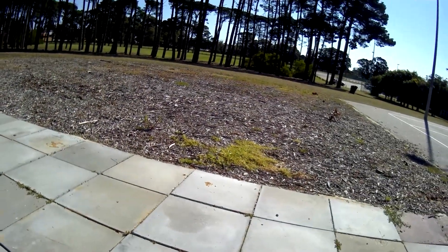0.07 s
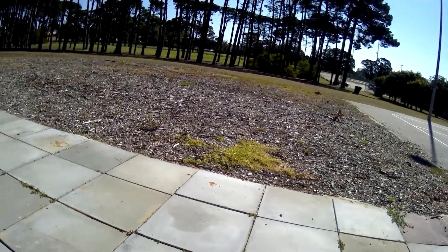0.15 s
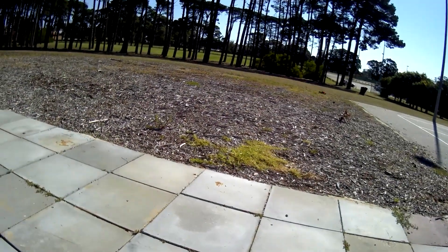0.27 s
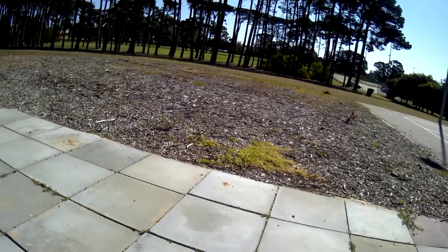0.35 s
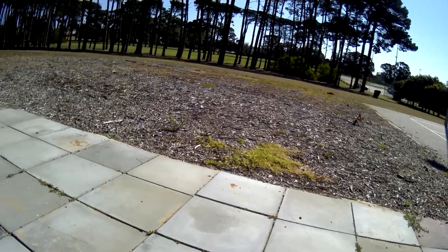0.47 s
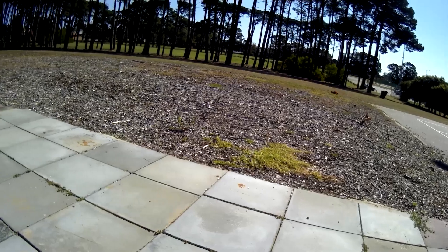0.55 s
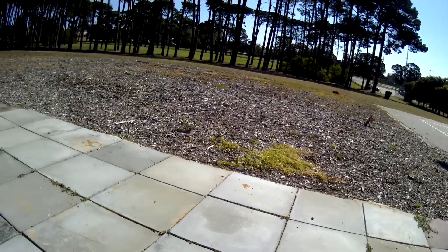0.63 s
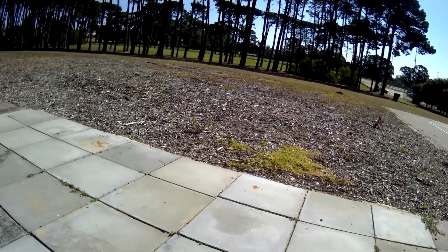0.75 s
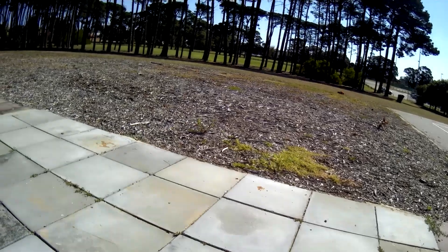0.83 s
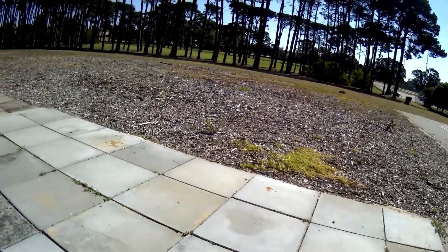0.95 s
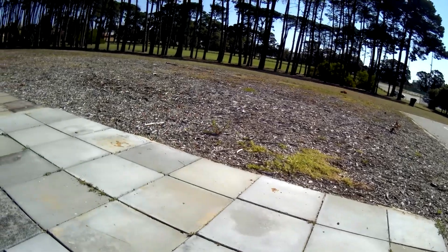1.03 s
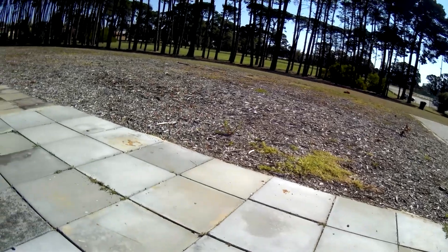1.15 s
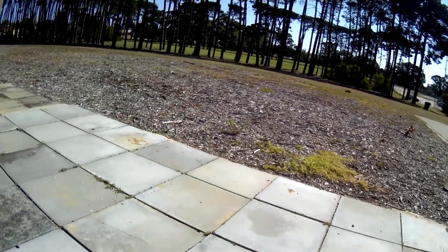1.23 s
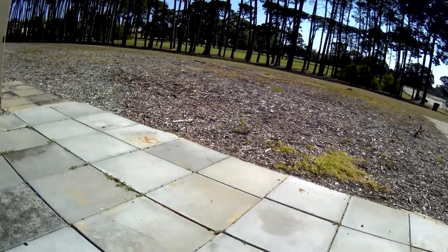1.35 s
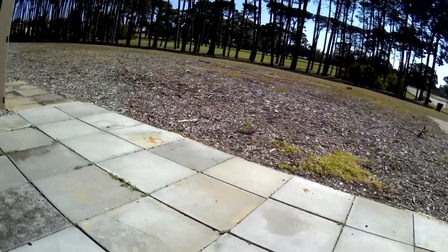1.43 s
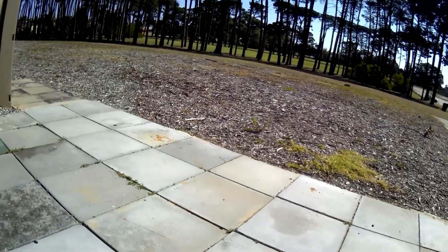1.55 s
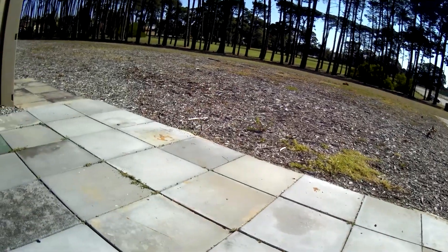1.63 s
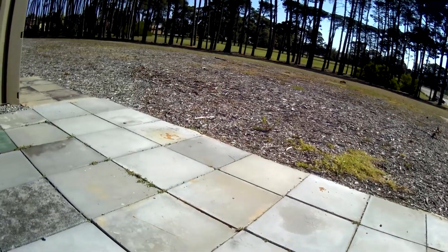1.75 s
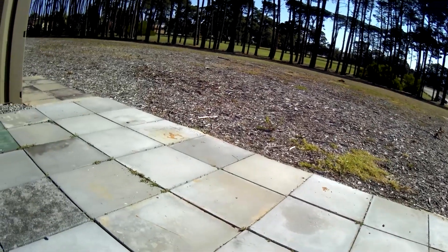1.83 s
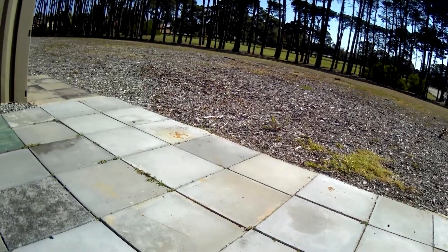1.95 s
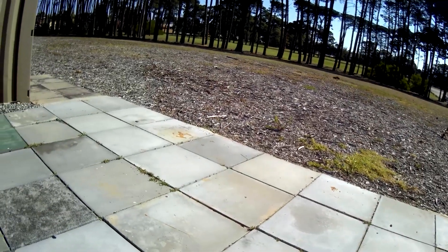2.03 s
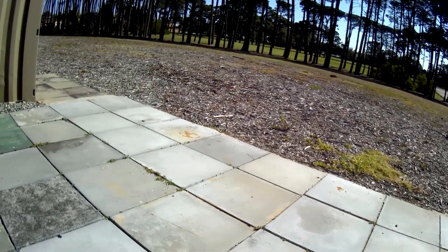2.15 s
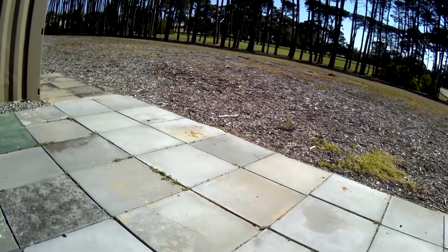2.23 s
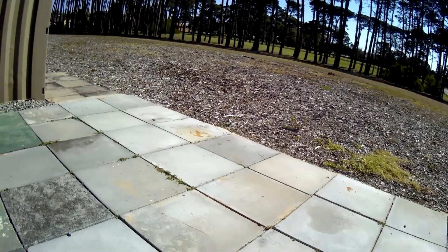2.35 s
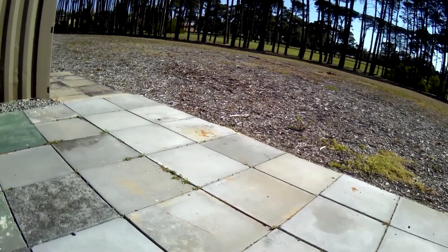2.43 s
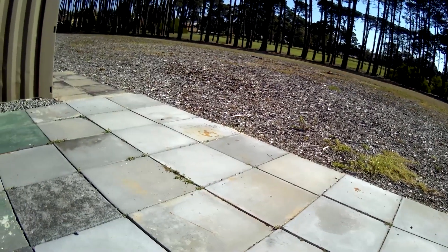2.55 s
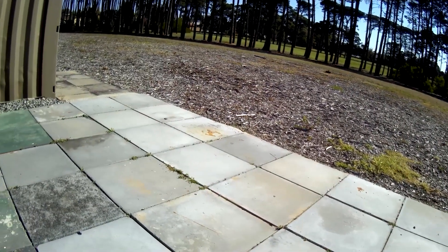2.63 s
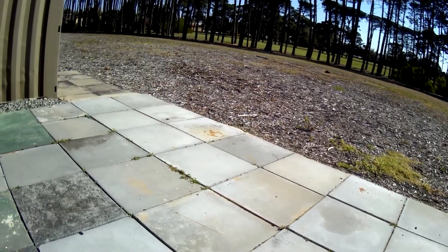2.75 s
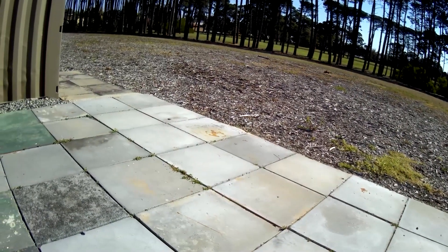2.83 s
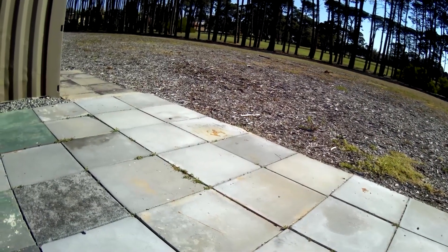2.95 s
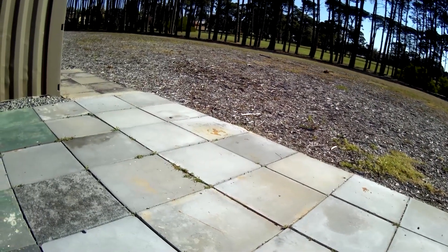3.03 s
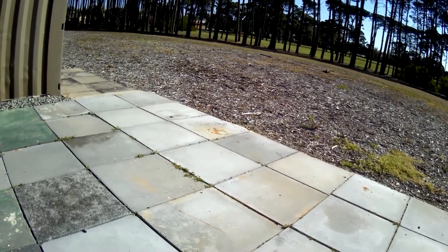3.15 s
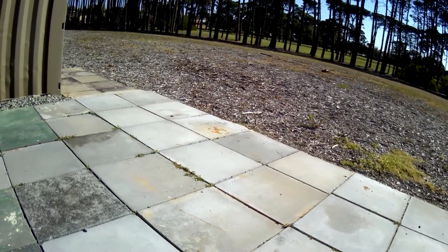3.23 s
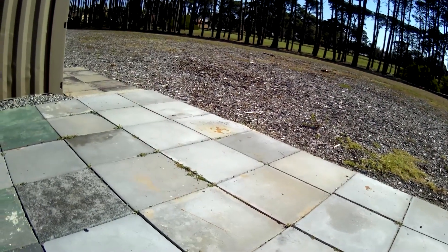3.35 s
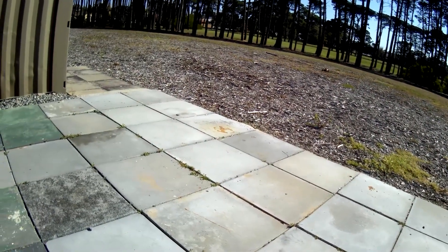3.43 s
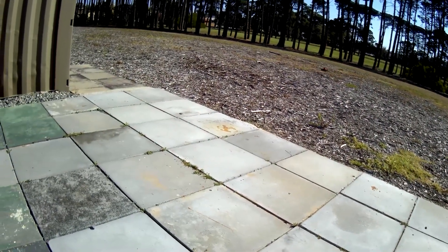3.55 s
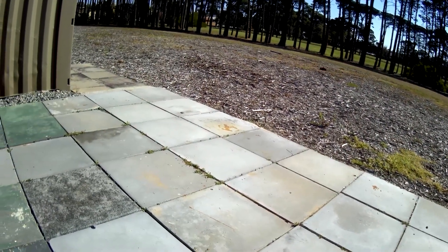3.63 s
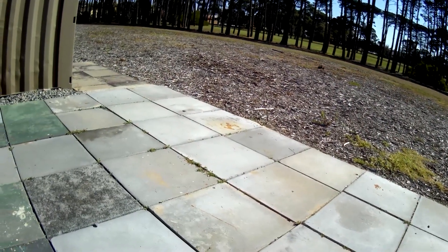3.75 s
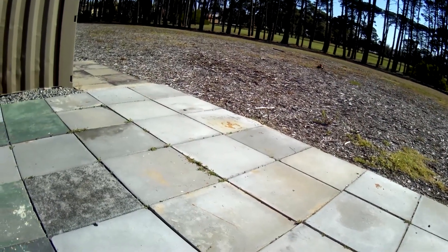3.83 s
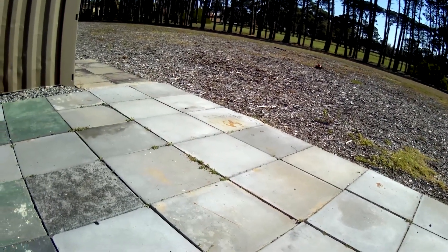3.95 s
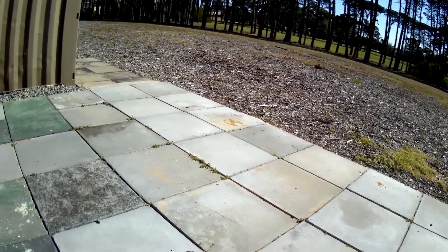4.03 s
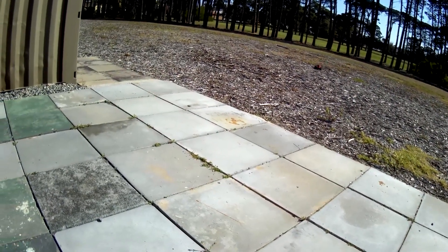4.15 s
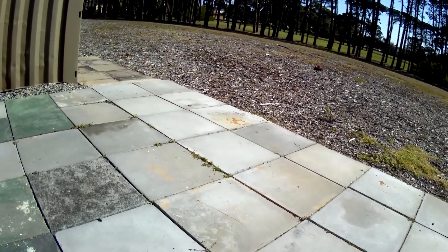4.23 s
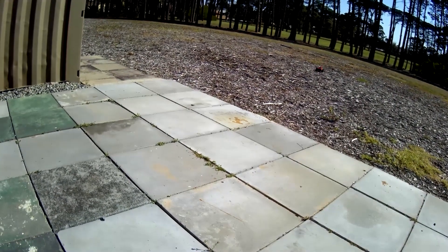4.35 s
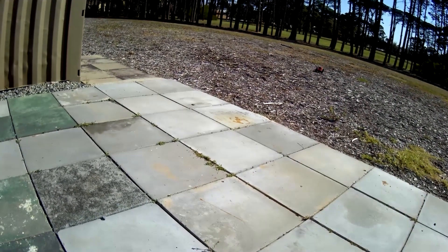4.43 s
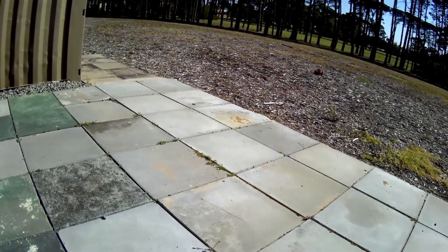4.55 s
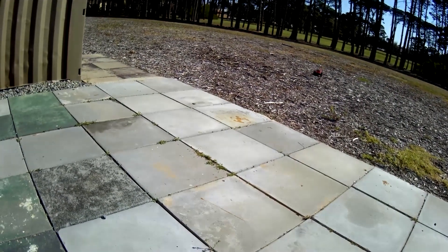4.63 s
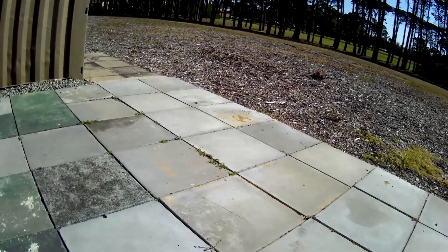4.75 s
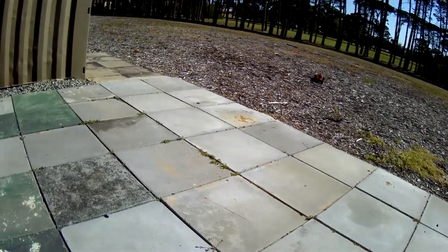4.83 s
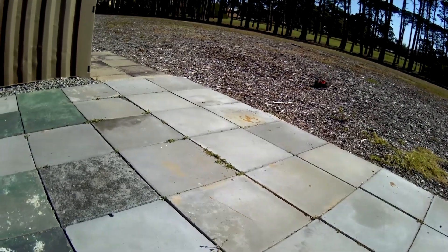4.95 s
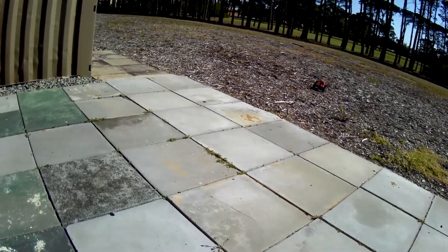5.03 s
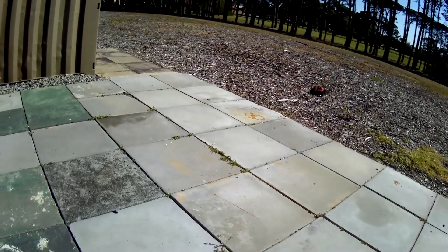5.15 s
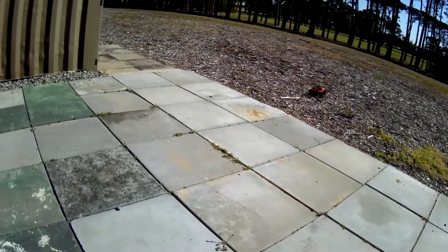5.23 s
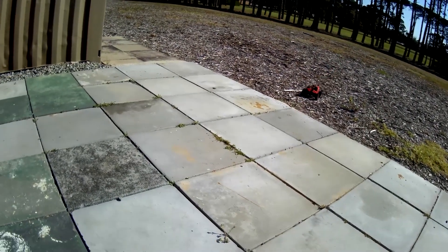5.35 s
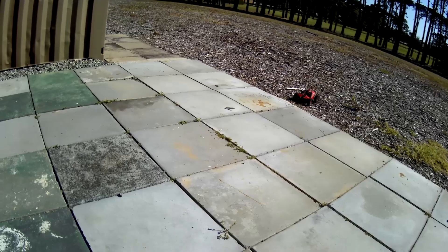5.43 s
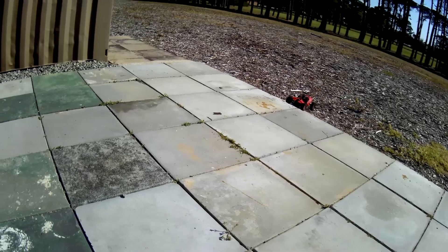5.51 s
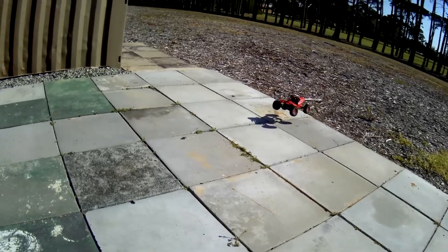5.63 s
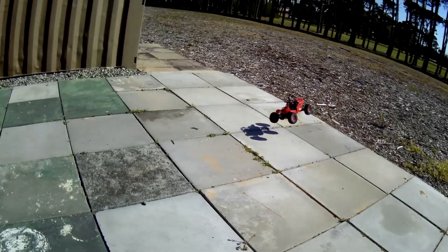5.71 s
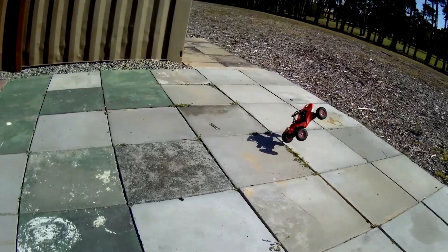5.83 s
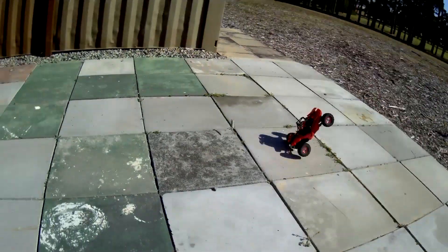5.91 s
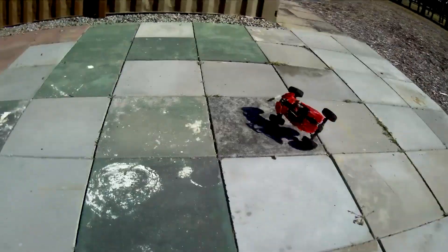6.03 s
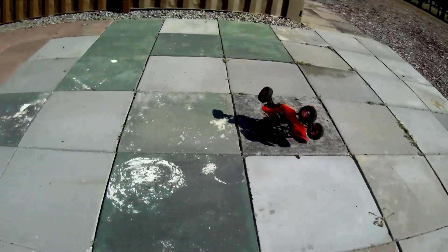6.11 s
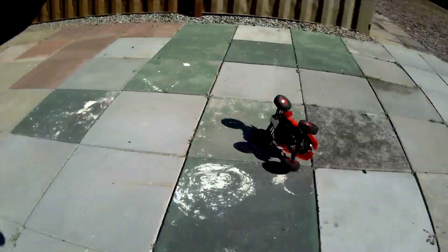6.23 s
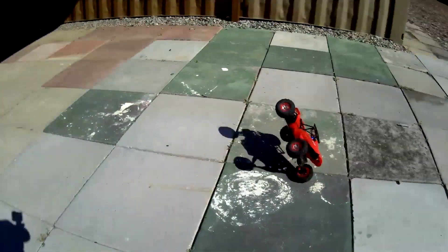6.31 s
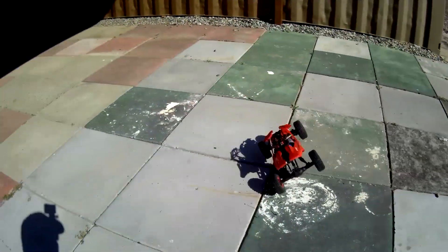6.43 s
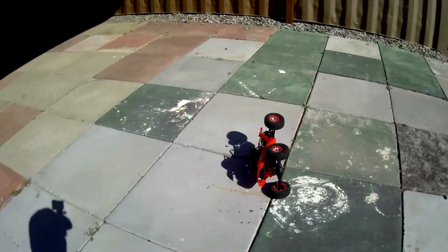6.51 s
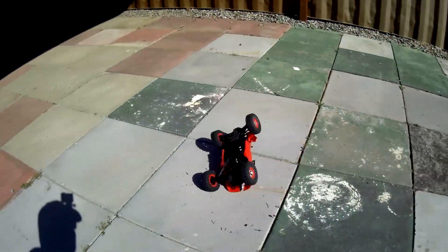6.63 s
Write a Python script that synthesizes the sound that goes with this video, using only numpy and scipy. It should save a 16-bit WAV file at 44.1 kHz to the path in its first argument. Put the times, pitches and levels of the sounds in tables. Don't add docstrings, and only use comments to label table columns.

```python
import sys
import numpy as np
from scipy import signal
from scipy.fft import irfft, next_fast_len
from scipy.io import wavfile
from scipy.ndimage import uniform_filter1d

SR = 44100
rng = np.random.default_rng(int(sys.argv[2]) if len(sys.argv) > 2 else 0)


def pcm_store(signal):
    levels = np.round(np.clip(np.atleast_2d(signal), -1, 1) * 32767)
    wavfile.write(sys.argv[1], SR, levels.astype(np.int16).T)


def attenuation_scalar(level_db):
    decades = np.asarray(level_db, float) / 20
    return 10 ** decades


N = 294271
T = np.arange(N) / SR


def evened(x):
    return x / np.sqrt(np.mean(x ** 2) + 1e-20)


def columns(rows):
    times_s, *values = np.transpose(rows)
    return [np.interp(T, times_s, v) for v in values]


def resonate(x, hz, width_hz):
    turn = np.exp(2j * np.pi * np.cumsum(hz * np.ones(len(x))) / SR)
    pole = np.exp(-np.pi * width_hz / SR)
    smooth = signal.lfilter([1 - pole], [1, -pole], x / turn + 1e-18)
    return 2 * (turn * smooth).real


def wobble(hz):
    once = resonate(rng.standard_normal(N), 0, hz)
    return evened(resonate(once, 0, hz))


def hiss(points):
    point_hz, point_db = np.transpose(points)
    hz = np.fft.rfftfreq(next_fast_len(N), 1 / SR)
    z = rng.standard_normal(len(hz)) + 1j * rng.standard_normal(len(hz))
    shape_db = np.interp(np.log(hz + 1), np.log(point_hz), point_db, left=-60, right=-90)
    return evened(irfft(z * attenuation_scalar(shape_db))[:N])


def grit(per_s, spread_db, bump_db):
    size = attenuation_scalar(spread_db * np.minimum(rng.exponential(1, N), 4)) * rng.choice([-1, 1], N)
    happens = rng.random(N) < per_s / SR
    return size * happens * attenuation_scalar(bump_db * wobble(52.0))


def truck():
    # start_s, rattle_db, thump_db (relative to the rattle)
    body = [
        [(0, -64, -8), (2, -61, -7), (3, -58.5, -2), (3.4, -53.5, -3.5), (3.9, -51.5, -5.5), (4.3, -49.5, -0.5)],
        [(4.4, -47, -1), (4.47, -45.5, -8), (4.8, -43, -1.5), (4.87, -40, -14), (4.9, -41.5, -3),
         (5.3, -38.5, -1.5), (5.61, -29.5, -7.5), (5.65, -36.5, -6.5), (5.72, -32.5, -22.5), (5.8, -32, -26),
         (5.95, -24.5, -10), (5.99, -27.5, -17), (6.01, -25, -17), (6.03, -33.5, -3), (6.04, -30, -16),
         (6.08, -23.5, 1.5), (6.09, -10, -31), (6.12, -33, -14), (6.15, -22.5, -18), (6.16, -27, -10),
         (6.18, -24.5, -25), (6.21, -23, -11), (6.27, -42, -6), (6.29, -34, 8), (6.31, -34, -13.5),
         (6.42, -46.5, -10.5), (6.48, -39, -2), (6.61, -41.5, -9.5), (6.64, -29.5, -11), (6.66, -39, -6),
         (6.67, -32.5, -2)],
    ]
    # start_s, level_db, centre_hz
    whine_course = [
        [(0.0, -87, 3360), (0.18, -77, 3165), (0.39, -73.5, 3460), (0.52, -78, 3210), (0.56, -74, 3290),
         (0.6, -88, 3460), (0.61, -61, 3470), (0.63, -77, 3490), (0.88, -72, 3050), (1.0, -78.5, 3210),
         (1.21, -64.5, 3100), (1.56, -81, 3270), (1.61, -69.5, 3050), (1.63, -85, 3070), (1.76, -63, 3060),
         (1.88, -85, 3120), (1.92, -62, 3120), (2.0, -61, 3150), (2.04, -77, 3060), (2.14, -62, 3020),
         (2.4, -75, 3040), (2.45, -61, 3095), (2.7, -73, 3300), (2.83, -64.5, 3140), (2.91, -75, 3340),
         (3.11, -65, 2945), (3.13, -81, 3100), (3.19, -63, 3450), (3.23, -81, 3260), (3.3, -61, 3140)],
        [(3.3, -57.5, 3080), (3.49, -55, 3380), (3.94, -54.5, 3460), (4.85, -45, 3580), (4.93, -52.5, 3460),
         (5.02, -39.5, 3230), (5.09, -51, 3560), (5.1, -42.5, 3585), (5.53, -37.5, 3396), (5.55, -32.5, 3300),
         (5.57, -40.5, 3370), (5.63, -39, 3696), (5.65, -25.5, 3510), (5.66, -38, 3650), (5.81, -49, 2994),
         (5.86, -54, 3260), (5.91, -41, 3430), (5.97, -33.5, 3210), (6.0, -49, 3390), (6.02, -44.5, 3530),
         (6.11, -36.5, 3210), (6.19, -57, 3210), (6.2, -46.5, 3184), (6.37, -73.5, 3080), (6.45, -74, 3220),
         (6.47, -64, 3400), (6.57, -60, 3250), (6.59, -86, 3190), (6.62, -59.5, 3215), (6.67, -50, 3160)],
    ]
    # centre_hz, width_hz, level_db
    modes = [(710, 400, -8.5), (970, 320, -2), (1150, 360, -5), (1327, 220, -4), (1538, 360, 5),
             (1991, 440, -8), (2570, 1000, -21.5)]
    rattle_db, thump_db = columns(body[0] + body[1])
    whine_db, whine_hz = columns(whine_course[0] + whine_course[1])

    shake = grit(2500., 2.2, 1.1)
    shell = 0
    for hz, width_hz, db in modes:
        mode = resonate(resonate(shake, hz, width_hz), hz, width_hz * 2.2)
        shell = shell + attenuation_scalar(db) / np.sqrt(width_hz) * mode

    teeth = grit(2200., 1.3, 3.2)
    unsteady_hz = whine_hz * (1 + 0.048 * wobble(25.))
    mesh = resonate(resonate(teeth, unsteady_hz, 220.0), whine_hz, 410.0)
    housing_band = signal.butter(4, (2950., 3720.), "band", fs=SR, output="sos")
    gearbox = signal.sosfilt(housing_band, teeth)
    whine = evened(1.4 * evened(mesh) + evened(gearbox))

    thump = resonate(resonate(grit(300., 2.7, 2.6), 320.0, 260.0), 360., 610.0)
    rolling = 0.91 * evened(shell) + attenuation_scalar(thump_db - 0.5) * evened(thump)
    return attenuation_scalar(rattle_db) * rolling + attenuation_scalar(whine_db + 1.5) * whine


def knocks():
    # start_s, peak_db, ring_hz, thud_db, thud_hz, tick_db
    blows = [(0.543, -32.5, 840, -20, 221, -30), (4.688, -30, 1225, -1, 295, 1.5),
             (4.95, -27.5, 1236, -15.5, 312, -8), (5.099, -27, 1410, 3.5, 223, -16),
             (5.198, -36, 1550, -5.5, 430, -13), (5.445, -25, 1760, 5.5, 240, -18),
             (5.522, -17.5, 1590, -22, 277, -8), (5.549, -16, 1600, -16, 358, -17),
             (5.6, -18, 854, -7.5, 437, -1), (5.641, -23, 1414, -11, 360, 9.5),
             (5.898, -23, 1540, -5, 390, -1.5), (5.938, -15.5, 1530, -24, 390, 1),
             (6.009, -17.5, 2116, -7, 221, -24.5), (6.04, -13.5, 1840, -23, 256, -15),
             (6.056, -14.5, 1885, -20, 221, -25), (6.063, -10.5, 1527, -21, 550, -42),
             (6.071, -11.5, 890, -1.5, 296, -14), (6.086, 0.5, 1585, -45, 320, -27.5),
             (6.101, -14, 1623, -24, 245, -27), (6.132, -9, 1425, -33, 221, -24),
             (6.145, -11, 1475, -29, 266, -37), (6.183, -15, 1706, -35, 345, -35),
             (6.21, -8, 866, -19.5, 390, -19.5), (6.232, -13, 1041, -8, 248, -18),
             (6.289, -22.5, 754, -6, 544, -30), (6.286, -21.5, 1597, 3, 215, -31),
             (6.471, -22, 1460, -4, 288, -40), (6.497, -26.5, 759, -1, 221, -23),
             (6.563, -27.5, 1610, -10, 336, -24), (6.624, -21.5, 1814, -19, 256, -18),
             (6.641, -16.5, 1472, -20, 380, -32), (6.663, -23, 1560, -21, 221, -24.5)]
    t = np.arange(4000) / SR
    out = np.zeros(N + len(t))
    rise = 1 - np.exp(-(t / 0.002) ** 2)
    for start_s, peak_db, ring_hz, thud_db, thud_hz, tick_db in blows:
        noise = rng.standard_normal((2, len(t)))
        ring = np.sin(2 * np.pi * ring_hz * t) * attenuation_scalar(-60 * t / 0.025)
        scatter = evened(resonate(resonate(noise[0], ring_hz, 580.0), ring_hz, 1100.))
        rattle = scatter * 0.25 * attenuation_scalar(-60 * t / 0.08)
        thud = np.sin(2 * np.pi * thud_hz * t) * attenuation_scalar(thud_db - 60 * t / 0.035)
        click = evened(resonate(resonate(noise[1], 3600.0, 900.), 3600.0, 900.))
        tick = click * attenuation_scalar(tick_db - 4.5 - 60 * t / 0.033)
        out[round(start_s * SR):][:len(t)] += attenuation_scalar(peak_db + 1.0) * rise * (ring + rattle + thud + tick)
    return out[:N]


def wind():
    # start_s, level_db
    gusts = [(0.0, -37.5), (0.05, -33.5), (0.33, -35), (0.45, -33), (0.61, -41), (0.7, -33), (0.95, -37),
             (1.17, -35.5), (1.36, -39), (1.95, -33.5), (2.12, -37), (2.15, -34.5), (2.27, -29),
             (2.36, -42.5), (2.38, -36.5), (2.56, -33), (2.6, -31.5), (2.71, -35.5), (2.86, -38),
             (2.97, -36.5), (3.17, -36), (3.27, -42.5), (3.4, -32), (3.49, -44.5), (3.53, -35), (3.6, -38),
             (4.03, -36), (4.09, -31.5), (4.12, -35.5), (4.25, -26.5), (4.31, -36.5), (4.38, -28.5),
             (4.42, -37.5), (4.48, -28), (4.64, -34.5), (4.7, -26), (4.85, -31), (4.89, -34.5), (4.92, -29),
             (5.05, -32), (5.16, -25.5), (5.22, -37.5), (5.27, -18.5), (5.33, -28.5), (5.39, -17.5),
             (5.46, -29), (5.52, -18), (5.59, -31), (5.65, -29.5), (5.68, -35), (5.72, -34.5), (5.78, -25),
             (5.87, -29.5), (5.93, -21), (5.98, -23), (6.17, -24.5), (6.18, -30.5), (6.22, -21),
             (6.32, -38), (6.35, -25.5), (6.43, -31.5), (6.52, -26.5), (6.56, -33.5), (6.67, -26.5)]
    # frequency_hz, level_db (per Hz)
    turbulence = [(7.1, -17), (12, 3), (26, -2.5), (54, -1), (98, -9), (130, -11), (166, -21.5),
                  (260, -24.5), (340, -48.5), (570, -120)]
    return attenuation_scalar(columns(gusts)[0] - 0.5) * hiss(turbulence)


def traffic():
    # frequency_hz, level_db (per Hz)
    roar = [(100, -26), (170, -2.5), (194, -2.5), (233, -5.5), (351, -9), (481, -6), (869, -6.5),
            (1090, -9), (1410, -10), (2360, -23.5), (3950, -29), (5140, -45), (8690, -120)]
    level_db = -46.5 - 0.44 + 1.1 * wobble(5.1)
    return attenuation_scalar(level_db) * hiss(roar)


def engine():
    # start_s, firing_hz, order_1_db, order_2_db, order_3_db
    running = [(0, 52, -50, -49.5, -72), (.6, 56, -36.5, -50.5, -53.5), (1.2, 59, -49, -46.5, -62),
               (1.8, 63, -38, -48, -70), (2.3, 66, -37.5, -46, -54.5), (2.6, 69, -38, -43.5, -61.5),
               (2.95, 72.5, -43.5, -47, -54), (3.3, 75, -44, -50.5, -61.5), (4, 75, -44.5, -50, -68),
               (4.8, 74, -50, -51.5, -60), (5.5, 70, -49.5, -47.5, -76), (6, 70, -37.5, -42, -55),
               (6.67, 74, -37, -47.5, -61.5)]
    firing_hz, *levels_db = columns(running)
    turns = np.cumsum(firing_hz * (1 + .012 * wobble(8.5))) / SR
    out = np.zeros(N)
    for order, db in enumerate(levels_db, 1):
        out += np.sqrt(2) * attenuation_scalar(db + 3.0 * wobble(3.3)) * np.sin(2 * np.pi * order * turns)
    return out


def bird():
    # start_s, pitch_hz, level_db
    chirp = [
        (3.08, 3050, -77),
        (3.1, 2800, -59),
        (3.14, 2450, -64),
    ]
    pitch_hz, level_db = columns(chirp)
    sounding = (T > chirp[0][0]) * (T < chirp[-1][0])
    return attenuation_scalar(level_db) * np.sin(2 * np.pi * np.cumsum(pitch_hz) / SR) * sounding


def scene():
    toy = truck() + knocks()
    echo = np.roll(toy, round(.011 * SR)) * attenuation_scalar(-15.0)
    return (toy + echo + wind() + traffic() + engine() + bird())[None]


def masked_rounding(x):
    # start_s, end_s, coarser_db
    starved = [
        (5.815, 5.89, 14.5),
        (5.995, 6.015, 12.5),
        (6.14, 6.19, 12.5),
        (6.265, 6.32, 12.5),
        (6.415, 6.465, 16.5),
        (6.58, 6.61, 12.5),
    ]
    mask_db, skirt_db, quiet_db = -11.0, 1.52, -75.0
    hop, start = 128, 91
    n, k = np.arange(2 * hop), np.arange(hop)
    window = np.sqrt(2 / hop) * np.sin(np.pi * (n + .5) / 2 / hop)
    basis = window * np.cos(np.pi / hop * (n + .5 + hop / 2) * (k[:, None] + .5))
    padded = np.pad(x, (hop - start, 2 * hop))
    lines = np.lib.stride_tricks.sliding_window_view(padded, 2 * hop)[::hop] @ basis.T

    power = uniform_filter1d(lines ** 2, size=4, axis=0) * (k > 6)
    slope = np.where(k > k[:, None], .5, 2)
    spread = power @ attenuation_scalar(-2 * skirt_db * abs(k - k[:, None]) * slope)
    frame_s = (np.arange(len(lines)) * hop + start) / 8000
    coarse_db = sum(db * (frame_s > a) * (frame_s < b) for a, b, db in starved)
    step = np.sqrt(spread) * attenuation_scalar(mask_db + coarse_db[:, None]) * (k / hop) ** 1.6 + attenuation_scalar(quiet_db)
    rounded = np.sign(lines) * np.floor(abs(lines) / step + .4) * step

    frames = rounded @ basis
    out = np.zeros((len(frames) + 1, hop))
    out[:-1] += frames[:, :hop]
    out[1:] += frames[:, hop:]
    return out.ravel()[hop - start:][:len(x)]


def low_pass(x):
    return signal.sosfilt(signal.butter(12, 9900, fs=SR, output="sos"), x)


def record(dry):
    low = signal.resample_poly(dry[0], 80, 441, window=("kaiser", 6.))
    low = masked_rounding(low)
    t = np.arange(-2000, 2001) / (80 * SR)
    half_s = .00045
    taper = np.i0(4.5 * np.sqrt(np.clip(1 - (t / half_s) ** 2, 0, 1))) * (abs(t) < half_s)
    kernel = np.sinc(2 * 4100. * t) * taper
    up = signal.resample_poly(low, 441, 80, window=kernel / kernel.sum())[:N]
    up = np.pad(up, (0, N - len(up))) + attenuation_scalar(-100.) * rng.standard_normal(N)
    return low_pass(up[None])


dry = scene()
out = record(dry)
pcm_store(out)
```